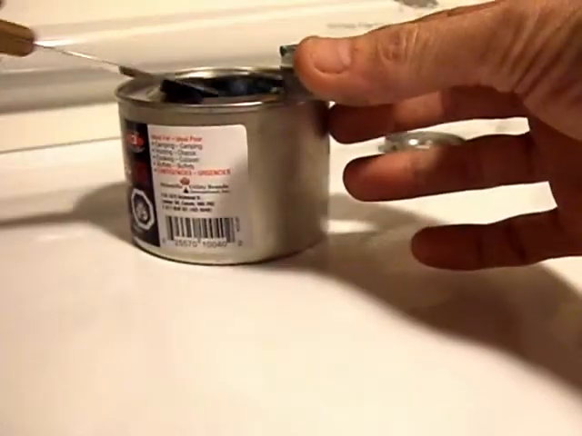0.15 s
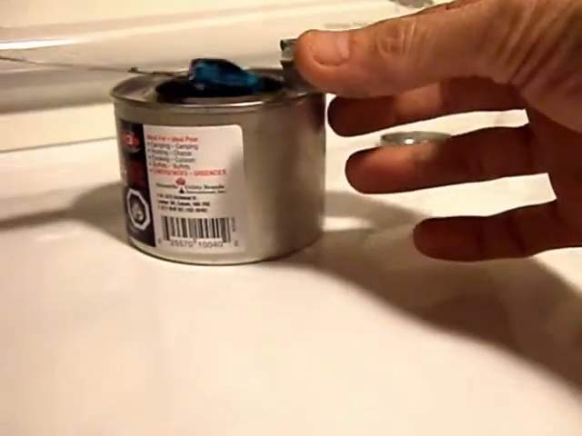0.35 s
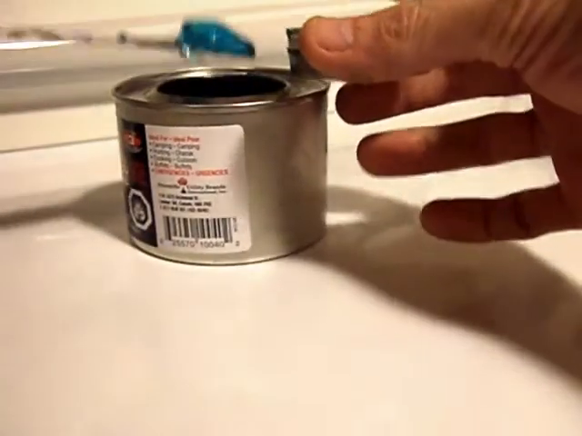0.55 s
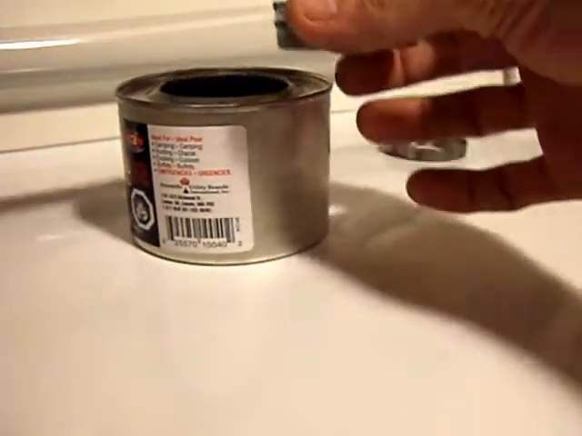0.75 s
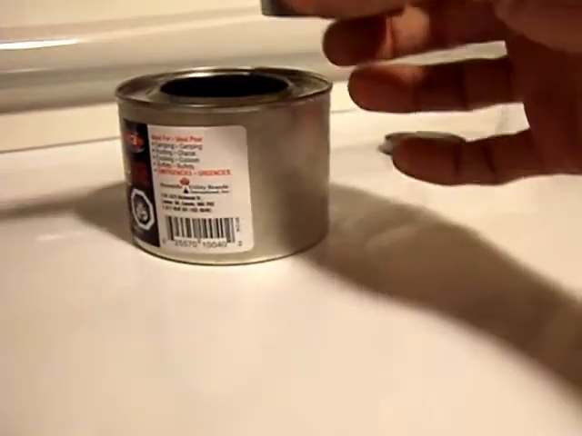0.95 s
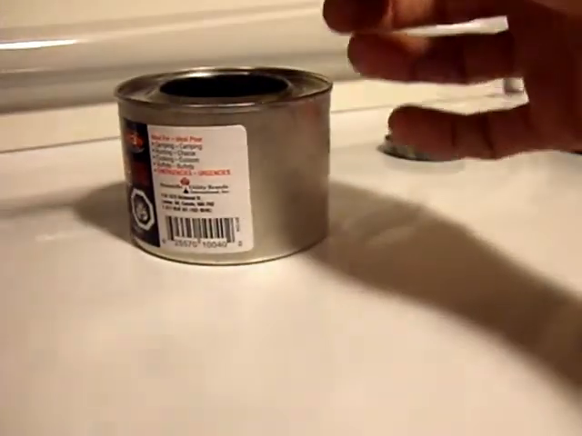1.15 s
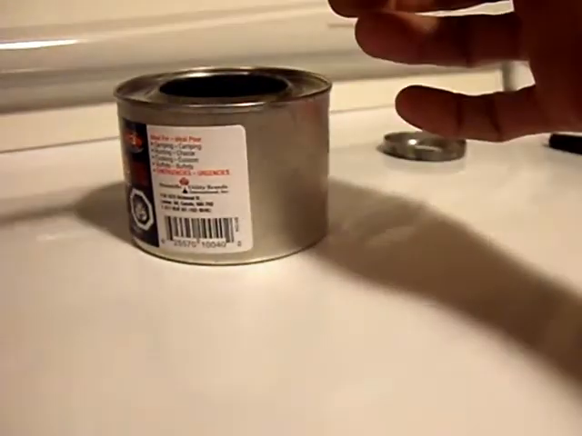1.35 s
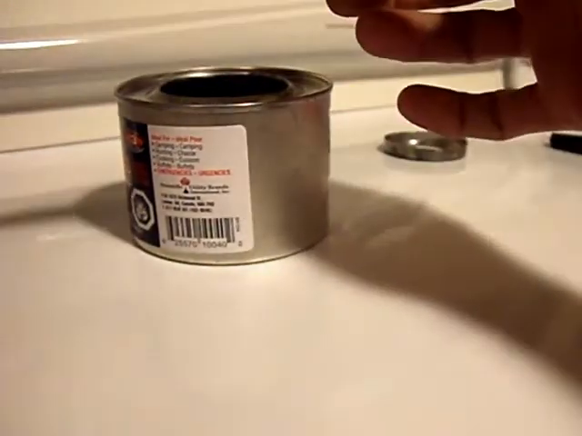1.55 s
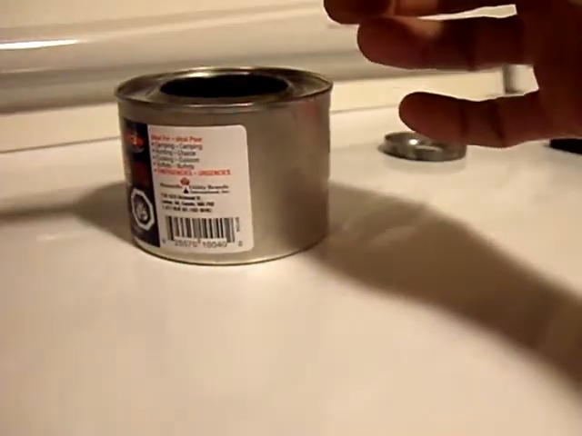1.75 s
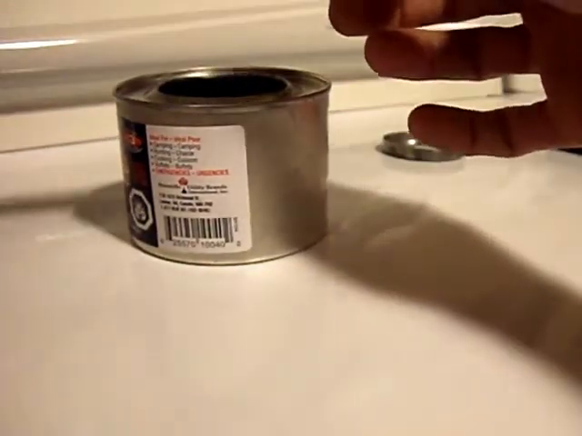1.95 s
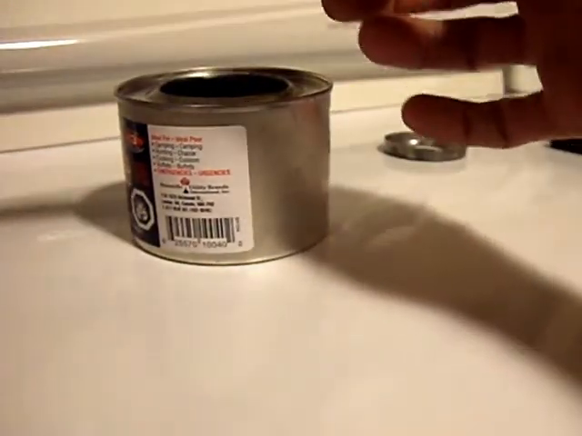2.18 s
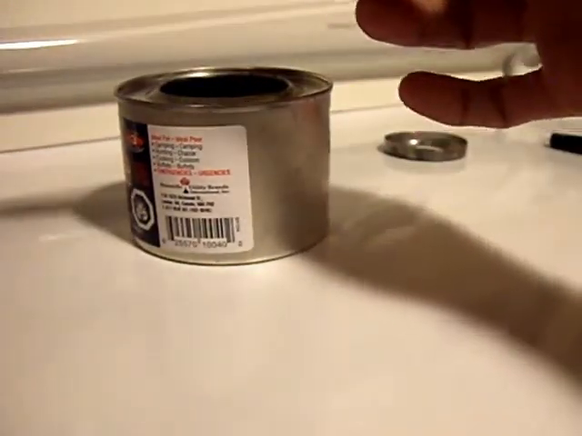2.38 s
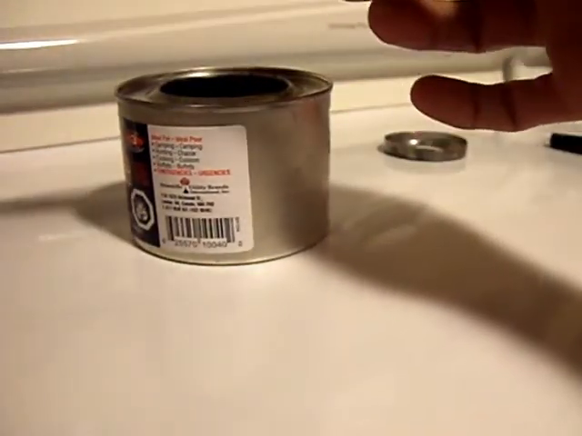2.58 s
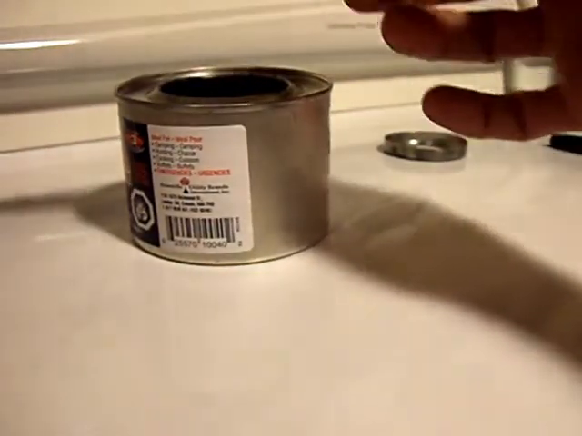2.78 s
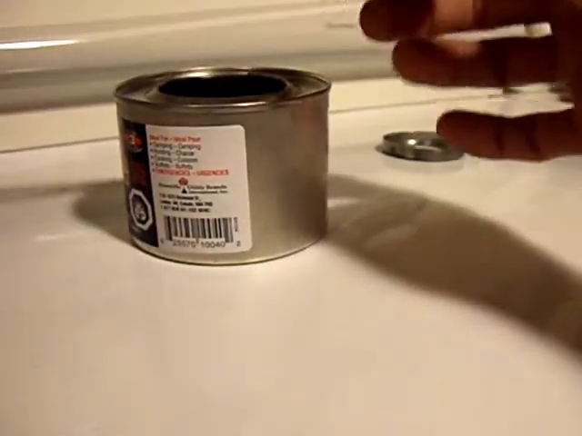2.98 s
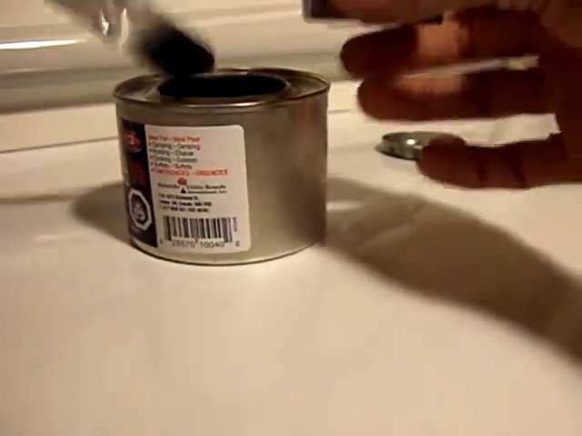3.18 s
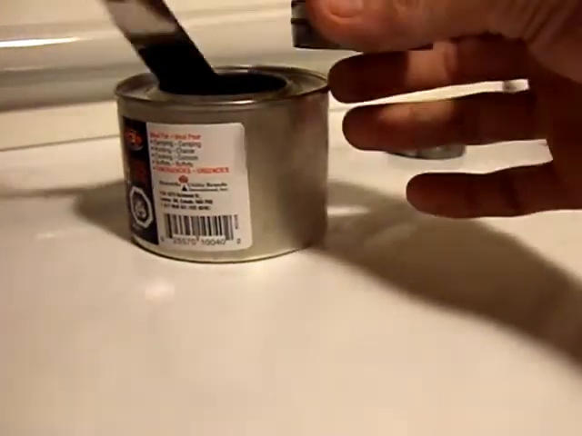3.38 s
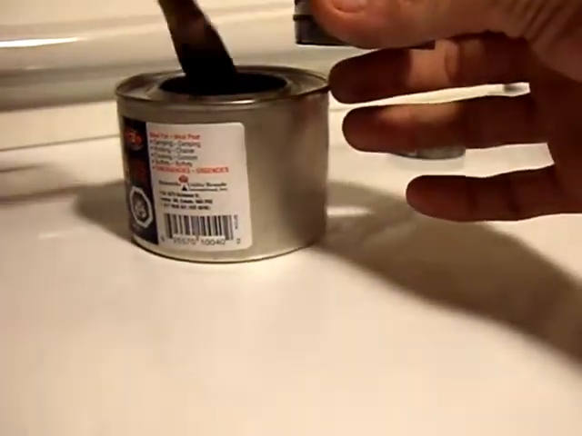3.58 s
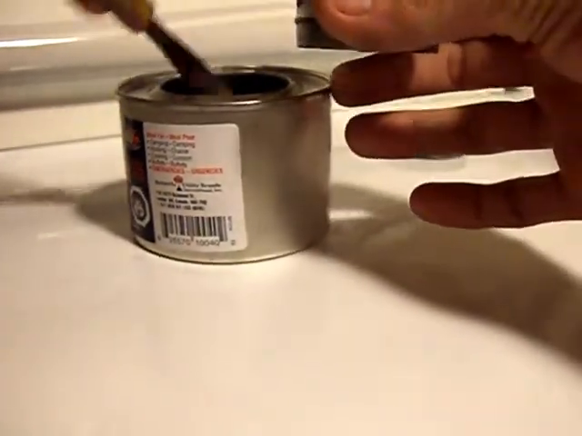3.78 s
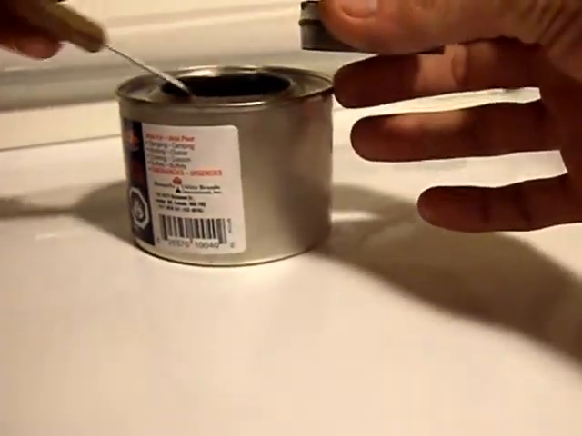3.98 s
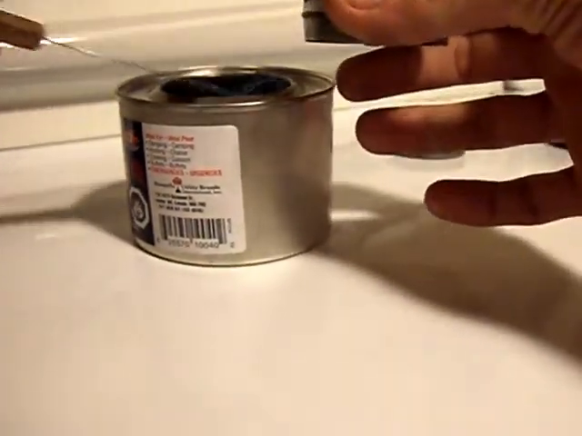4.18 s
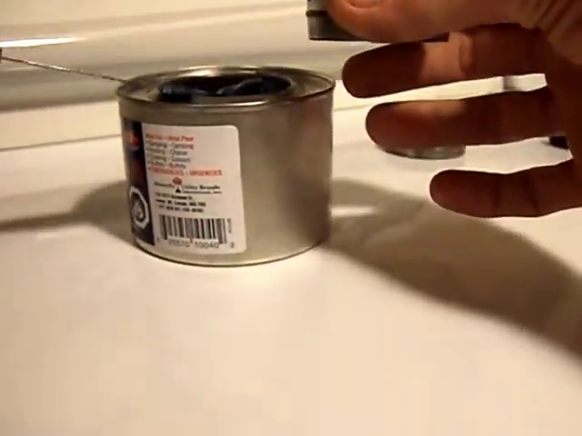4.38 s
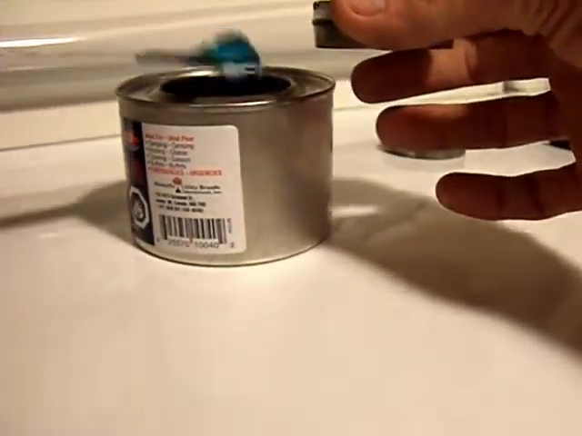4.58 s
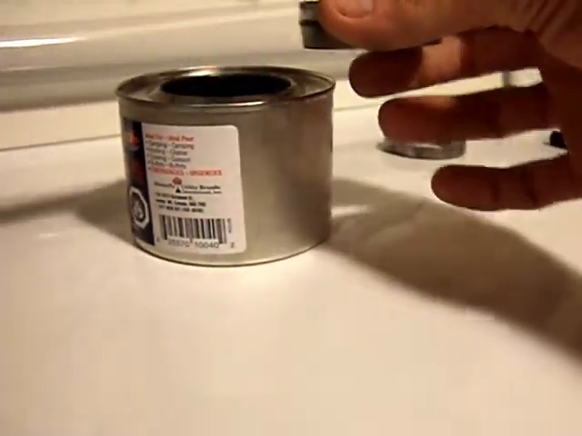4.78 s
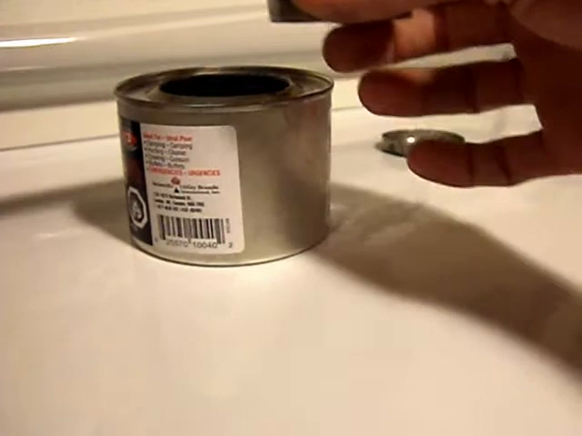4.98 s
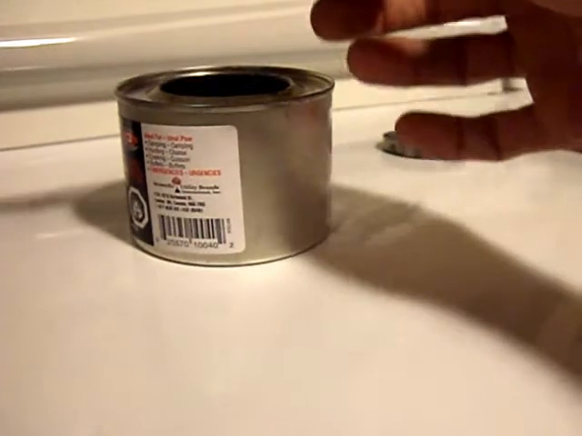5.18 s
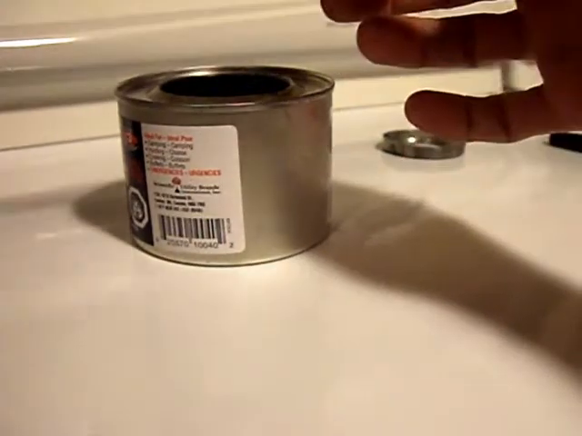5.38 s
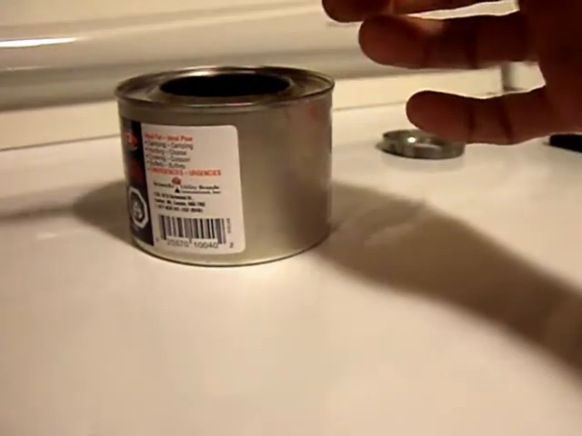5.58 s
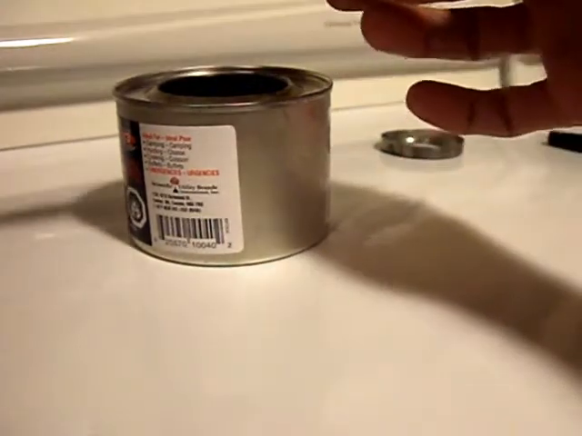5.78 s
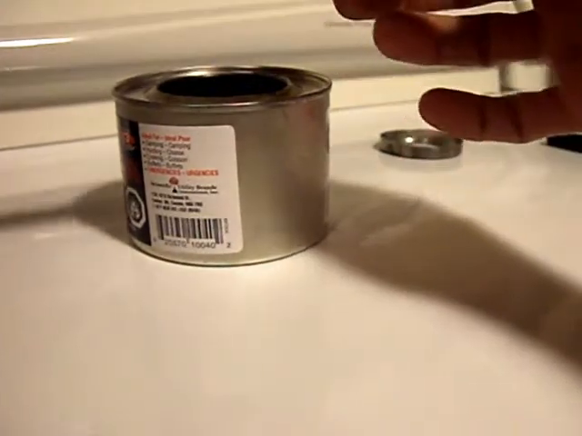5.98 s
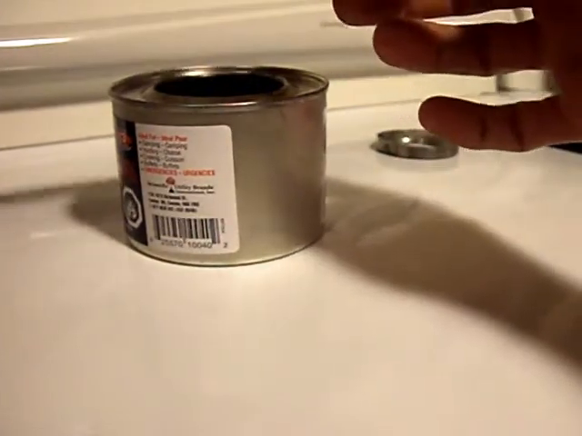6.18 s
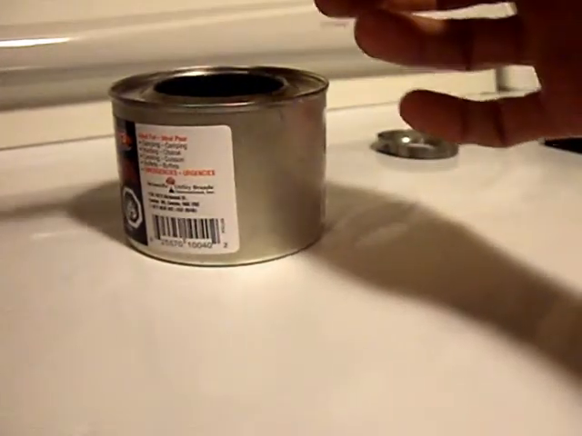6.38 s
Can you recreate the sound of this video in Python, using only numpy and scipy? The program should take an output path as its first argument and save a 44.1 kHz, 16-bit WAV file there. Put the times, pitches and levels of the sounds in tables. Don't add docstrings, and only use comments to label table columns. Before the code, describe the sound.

Bright clinks and short wet scrapes of a spoon on tin, a loud can clatter midway, then faint taps, with camera whine and low hum behind.

```python
import sys
import numpy as np
from scipy import signal
from scipy.fft import rfft, irfft
from scipy.io import wavfile

SR = 44100
rng = np.random.default_rng(int(sys.argv[2]) if len(sys.argv) > 2 else 0)


def elevation(decibels):
    levels = np.asarray(decibels, float)
    return 10 ** (levels / 20)


def put_to_file(sound):
    columns = np.atleast_2d(sound).T
    safe = np.clip(columns, -1, 1)
    whole_steps = np.round(safe * 32767)
    wavfile.write(sys.argv[1], SR, whole_steps.astype(np.int16))


N = 284445


def can():
    edges_hz = [520, 1050, 1700, 4500, 15600]
    # start in seconds, wall level in dB, base against it in dB, brightness in dB.
    knocks_at = [
        [(0.0024, -40.5, 0, 10.5), (0.084, -41, 2, -3), (0.136, -38, 9, 2)],
        [(3.3019, -4.5, -9.5, 3), (3.371, -11, -14, -12), (3.384, -24, -7, 0), (3.396, -22, -9, -6),
         (3.411, -20, -16, -1), (3.44, -13, -14, -2), (3.458, -18.5, -15, 5.5), (3.483, -18, -18, -12)],
        [(3.6316, -26.5, 2.5, 6), (3.6775, -13, 0.5, 5.5)],
        [(3.903, -6, 1.5, 5.5), (3.93, -20.5, 8, 5.5)],
        [(4.4206, -14, 10, 8.5)],
    ]
    # time of full pressure in seconds, hold in seconds,
    # wall level in dB, lift-off in seconds for 30 dB, rasp in dB.
    strokes_at = [
        [(0.0, .01, -38.5, 0.11, 2), (0.04, 0.021, -46, 0.1, -7), (0.086, .03, -45, 0.08, -2),
         (0.128, 0.02, -43, 0.03, -6)],
        [(3.316, 0.038, -21.5, 0.05, 3), (3.375, 0.11, -23, 0.0648, -2), (3.51, 0.0059, -49, 0.18, -24)],
        [(3.637, .022, -35.5, -0.04, 8.5), (3.683, 0.0011, -20.5, 0.097, 0), (3.7, 0.0044, -35.5, 0.15, -2)],
        [(3.915, 0.047, -34.5, 0.07, 3), (3.972, 0.024, -27.5, 0.0969, -3.5), (4.005, 0.036, -26, 0.0755, 5)],
    ]
    # frequency in Hz, t60 in seconds.
    shell_rings = [(548, .7), (824, .13), (904, .22), (956, .62)]
    shell_db = [(-19, -22, -18, -12.5, -18), (-5, -7.5, -13, -2, 0), (-5, -6, 0.5, -3, 0),
                (-8, -11, -11, -4.5, -1)]
    wall_hz = [760, 1140, 1310, 1385, 1500, 1690, 1800, 2240, 2320, 2380, 2640, 2810, 3110, 3450, 3750,
               4240, 5200, 5610, 6260, 7480, 8090, 8740, 9300, 10500, 11250, 12400]
    # width in Hz, then level in dB at each of the five places.
    wall_modes = [(55, 3.5, -16, -12, -3, -42), (61, -2, 7.5, 4.5, -14, -28), (55, 5, 5, -8.5, 6.5, -9.5),
                  (55, -5, -9, -3, -14, -15), (55, -11, -11, -11, -5, -16), (58.6, 4.5, -2, -4, -2, -17),
                  (45, -7, -8, -12, -3, -4), (70.4, -13, -29, -5, -5, -24), (54.7, 0, 4.5, -2, -2, -11),
                  (54.6, -11, 6.5, 0, -1, -20), (55, -4, 4, -13, -6, -20), (60, -19, 1.5, -17, -3, -6),
                  (55, -12, 0.5, 1.5, -3, -32), (91, -4.5, 2, 0, -4, -3), (60, -24, -6, -0.5, -3, -2),
                  (55, -11, -4.5, -6.5, -4, -23), (60, -20, -8, -5, -1, -1), (60, -8, -2, -10, -4.5, -18),
                  (59.4, 6, -2, 1, -1.5, 3.5), (110, -5, -1, -3, -3.5, -4), (80, -10, 3, -3, -3, -11),
                  (120, -6, -1, -4, -1, -6), (120, -9, -10, -9, -1.5, -22), (80, -1.5, -4, 0, 5.5, -4),
                  (90, -11, -5, 0, -2, 4), (200, -14, -15, -1.5, 1.5, -5)]
    rub_db = [-4, -2, -3.5, -8.5]
    rasp_share = [-0.051, -0.18, 0.41, 0.92]
    keeps = [(0.81, 0.4), (0.82, 0.48), (0.62, 0.15), (0.31, 0.68), (0.84, .55)]
    touch = (rub_db, rasp_share, 0.017)
    slips = friction(per_s=4000, uneven_db=3, stutter_db=1.5)
    out = np.zeros(N)
    for place, (knocks, strokes) in enumerate(zip(knocks_at, strokes_at + [[]])):
        shell = [(hz, db[place], t60) for (hz, t60), db in zip(shell_rings, shell_db)]
        peaks = [(hz, width, db[place]) for hz, (width, *db) in zip(wall_hz, wall_modes)]
        modes = shell + as_modes(peaks, narrowing=1.4)
        out += vessel(modes, edges_hz, struck(knocks, upper_db=-5), strokes, touch, slips,
                      crack_db=[-6, 3, 9, 15], crack_s=0.012, rattle=0.06, keeps=keeps[place], grit_db=-8)
    return out


def tin():
    edges_hz = [1000, 3100, 4500, 7200, 15600]
    # frequency in Hz, width in Hz, level in dB.
    peaks_empty = [(1280, 150, -16), (2670, 39, -8), (2723, 46, -3.5), (3320, 110, -12), (3620, 160, -7),
                   (3960, 49, 2.5), (4070, 90, -7), (5020, 99, -8), (5680, 42, -10.5), (6300, 37, -3.5),
                   (6620, 60, -12), (8050, 140, -2), (11580, 170, -11)]
    peaks_dabbed = [(2470, 85, -9.5), (4000, 44, -14), (4050, 130, 2), (4860, 64, -20), (5740, 130, -16),
                    (6370, 71, -14), (8000, 130, -8.5), (10800, 98, -8), (11970, 210, -8)]
    peaks_half = [(2460, 55, -12.5), (3910, 100, 8), (5280, 230, -10), (5960, 620, -6), (8150, 120, -7.5),
                  (10270, 76, -10.5), (10800, 63, -15), (11020, 50, -8), (3980, 150, -7), (13500, 63, -16)]
    peaks_full = [(2390, 110, -17), (3780, 48, 11), (4020, 87, -9), (4670, 150, -14.5), (5970, 93, -16),
                  (7640, 110, -5.5), (8070, 97, 1.5), (8830, 74, -1), (9750, 130, -3), (10760, 330, -3),
                  (11300, 290, -4), (12270, 170, -3)]
    # start in seconds, main ring in dB, low band against it in dB, brightness in dB.
    taps_empty = [(1.268, -14.5, -2, 0.5), (1.284, -24.5, 4, -1), (1.3366, -19, -1.5, 3),
                  (1.3494, -28, 4, -9), (1.3996, -30, 7.5, -10), (1.408, -27.5, 5, -8)]
    taps_dabbed = [
        (1.6275, -18, -14, -5.5),
        (1.845, -31.5, -11, 0.5),
    ]
    taps_half = [(2.3426, -8.5, -17.5, -4.5), (2.3676, -19, -23, -30), (2.4765, -32, -7, -2.5),
                 (2.555, -36.5, 0, -16), (2.596, -38, 1, -2), (2.71, -43, 0, 14), (2.756, -36, -9, 8.5),
                 (2.855, -29, -21, -10), (2.903, -25, -8, -7), (2.9366, -17.5, -13, -8),
                 (2.9532, -33, -4, 7.5)]
    taps_full = [(5.7965, -28.5, -2.5, 5), (5.8365, -28.5, -2, 6), (5.885, -35, -10, -14),
                 (5.9778, -34, -3, -1.5), (6.0578, -33, -17, 0), (6.076, -45, -14, -10),
                 (6.103, -41, -16, -6), (6.112, -36, -14, -12), (6.1294, -44.5, -6, 20),
                 (6.1464, -33, -24, 9)]
    # time of full pressure in seconds, hold in seconds,
    # main ring in dB, lift-off in seconds for 30 dB, rasp in dB.
    wipes_empty = [
        (1.394, 0.02, -33, 0.045, -5),
    ]
    wipes_dabbed = [(1.54, 0.0062, -52, 0.0092, -12), (1.6, .02, -55, .02, 0),
                    (1.68, 0.011, -56, 0.017, -5), (1.72, 0.15, -55, .05, -1),
                    (1.864, 0.064, -53.5, 0.16, 3), (1.929, 0.0089, -48, 0.077, -6),
                    (1.953, 0.012, -39.5, 0.057, 2), (1.988, 0.0064, -45.5, 0.023, 3.5)]
    wipes_half = [(2.361, 0.054, -37.5, 0.1, 0.5), (2.479, 0.016, -39, 0.054, -4),
                  (2.557, 0.0034, -41, 0.013, -7), (2.597, 0.0055, -38.5, 0.065, 1),
                  (2.687, 0.082, -52.5, 0.023, 10.5), (2.78, 0.018, -43, 0.33, 0.5),
                  (2.853, .01, -41.5, 0.18, 10), (2.948, 0.0096, -29, 0.015, 3),
                  (2.975, .01, -62, 0.045, 4)]
    wipes_full = [(5.85, .005, -45, 0.041, -4), (5.884, 0.076, -58.5, 0.037, 6),
                  (5.984, 0.0045, -48, .04, -3), (6.01, .04, -58, 0.056, 12), (6.06, .006, -50, 0.1, 5),
                  (6.112, 0.0045, -36.5, 0.033, -1), (6.129, 0.0031, -43, 0.021, 4),
                  (6.148, 0.0055, -42.5, 0.021, 8)]
    rub_db = [-8.5, -3.5, -7, -3.5]
    rasp_share = [0.33, 0.041, 0.68, 0.62]
    touch = (rub_db, rasp_share, 0.03)
    slips = friction(per_s=8000, uneven_db=3.5, stutter_db=1.6)
    fillings = [(peaks_empty, taps_empty, wipes_empty), (peaks_dabbed, taps_dabbed, wipes_dabbed),
                (peaks_half, taps_half, wipes_half), (peaks_full, taps_full, wipes_full)]
    out = np.zeros(N)
    for peaks, taps, wipes in fillings:
        modes = as_modes(peaks, narrowing=1.5)
        out += vessel(modes, edges_hz, struck(taps, upper_db=-5.5), wipes, touch, slips,
                      crack_db=[2.4, 6.7, 2.3, 6], crack_s=0.006, rattle=0.15, keeps=(0.9, 0.3), grit_db=2.5)
    return out


def vessel(modes, edges_hz, hits, strokes, touch, slips, crack_db, crack_s, rattle, keeps, grit_db):
    rows = np.array(hits)
    starts = [hits[0][0]] + [row[0] - 0.05 for row in strokes]
    ends = [hits[-1][0]] + [row[0] + row[1] for row in strokes]
    first = max(int(min(starts) * SR) // 2048 * 2048, 0)
    last = min(N, int(max(ends) * SR) // 2048 * 2048 + 22000)
    size = last - first
    out = np.zeros(N)

    lag = np.arange(160)
    contact = rattle * rng.standard_normal((len(rows), len(lag))) * np.exp(-lag / 40)
    contact[:, 0] = 1
    at = (np.ceil(rows[:, :1] * SR).astype(int) + lag).ravel() - first

    knocked, held = ([(hz, db, np.clip(share, 0.15, 1) * t60) for hz, db, t60 in modes] for share in keeps)
    gains = pressure(strokes, np.arange(first, last) / SR, *touch)
    for k, rub in enumerate(gains):
        low_hz, high_hz = edges_hz[k], edges_hz[k + 1]
        free = response(knocked, low_hz, high_hz, crack_db[k], crack_s, spread_db=0.5)
        since = np.arange(len(free)) / SR
        free = free * (1 + 3.3 * np.exp(-(since / 0.011) ** 2))
        level = elevation(rows[:, 1:2] + rows[:, k + 2:k + 3])
        blows = np.bincount(at, (contact * level).ravel(), size)
        out[first:last] += signal.fftconvolve(blows / np.abs(free).max(), free)[:size]
        if not strokes:
            continue
        spots = elevation(9.1 * np.array([drift(10.4, size) for spot in range(3)]))
        for weight in spots / np.linalg.norm(spots, axis=0):
            answer = response(held, low_hz, high_hz, crack_db[k] + grit_db, crack_s, spread_db=2.5)
            drive = weight * rub * slips[first:last]
            out[first:last] += signal.fftconvolve(drive, answer)[:size] / np.linalg.norm(answer)
    return out


def struck(hits, upper_db):
    return [(s, db, low, 0, bright + upper_db, bright) for s, db, low, bright in hits]


def as_modes(peaks, narrowing):
    return [(hz, db + 20 * np.log10(width / 50), narrowing * 2.2 / width) for hz, width, db in peaks]


def response(modes, low_hz, high_hz, crack_db, crack_s, spread_db):
    t = np.arange(SR // 2) / SR
    crack = rng.standard_normal(len(t)) * elevation(-60 * t / crack_s)
    out = elevation(crack_db) * band(crack, max(low_hz, 700), high_hz)
    for hz, db, t60 in modes:
        luck = spread_db * rng.standard_normal(2)
        if low_hz <= hz < high_hz:
            envelope = elevation(db + luck[0] - 60 * t / t60) * (1 - np.exp(-hz * t / 1.2))
            out += envelope * np.sin(2 * np.pi * hz * (1 + 0.0012 * luck[1]) * t)
    return out


def friction(per_s, uneven_db, stutter_db):
    sizes = elevation(uneven_db * np.minimum(rng.exponential(1, N), 4)) * rng.choice([-1, 1], N)
    slipping = rng.random(N) < per_s / SR
    return unit(sizes * slipping * elevation(stutter_db * drift(60)))


def pressure(strokes, t, rub_db, rasp_share, press_s):
    out = np.zeros((4, len(t)))
    for s, hold_s, db, lift_s, rasp_db in strokes:
        pressing = np.maximum(s - t, 0) / press_s
        lifting = np.maximum(t - s - hold_s, 0) / max(lift_s, 0.003)
        colour_db = np.array(rub_db) + rasp_db * np.array(rasp_share)
        out += elevation(db - 30 * np.minimum(pressing + lifting, 6) + colour_db[:, None])
    return out


def hollow():
    # start in seconds, length in seconds, first frequency in Hz, last frequency in Hz, level in dB.
    slides = [
        (2.361, 0.14, 3800, 3050, -35),
        (2.537, 0.045, 5100, 4850, -39.5),
        (2.586, 0.066, 4880, 4810, -36),
        (6.007, 0.13, 3960, 4330, -46),
    ]
    out, flutter = np.zeros(N), drift(260)
    for s, length_s, from_hz, to_hz, db in slides:
        u = np.linspace(0, 1, int(length_s * SR))
        i = int(s * SR)
        hz = to_hz + (from_hz - to_hz) * (1 - u) ** 5.4
        swell = np.sin(np.pi * u ** 0.38) ** 2
        tone = np.sin(2 * np.pi * np.cumsum(hz) / SR)
        out[i:i + len(u)] += elevation(db) * swell * flutter[i:i + len(u)] * tone
    return out


def thuds():
    # start in seconds, peak in dB, frequency in Hz, t60 in seconds.
    pushes = [(2.957, -26, 470, 0.028), (2.957, -34.5, 272, 0.099), (3.647, -29, 220, 0.051),
              (3.679, -21, 200, 0.071), (3.681, -8, 567, 0.018), (3.727, -23.5, 244, 0.037),
              (3.902, -17.5, 325, 0.026), (3.907, -29, 467, 0.3), (3.7, -26, 240, 0.06)]
    t, out = np.arange(N) / SR, np.zeros(N)
    for s, db, hz, t60 in pushes:
        since = np.maximum(t - s, 0)
        envelope = elevation(db - 60 * since / t60) * (1 - np.exp(-since / 0.0011))
        out += envelope * np.sin(2 * np.pi * hz * since)
    return out


def room(x):
    # frequency in Hz, t60 in seconds.
    decay = [(200, 0.48), (1000, 0.26), (4000, 0.16), (12000, 0.11)]
    t = np.arange(SR // 2) / SR
    edges_hz = np.r_[100 * 2 ** np.arange(7), 16000]
    tail = np.zeros(len(t))
    for low_hz, high_hz in zip(edges_hz[:-1], edges_hz[1:]):
        t60 = at_hz(decay, np.sqrt(low_hz * high_hz))
        tail += band(rng.standard_normal(len(t)), low_hz, high_hz) * elevation(-60 * t / t60)
    tail *= 1 - np.exp(-t / 0.00037)
    return signal.fftconvolve(x, tail / np.linalg.norm(tail))[:N]


def background():
    # frequency in Hz, level in dB per Hz.
    hiss_spectrum = [(410, -44), (750, -10.5), (1480, -1.5), (2030, -3.5), (2970, -6), (6600, -13),
                     (7300, -9.5), (7900, -14), (8300, -13), (10200, -15), (12300, -11), (13300, -8),
                     (15000, -5.5), (16500, -36)]
    # frequency in Hz, level in dB per Hz.
    rumble_spectrum = [(15, -45), (25, -17), (69, -16), (107, -4), (177, -2), (412, -1), (517, -2),
                       (1200, -8), (1560, -32), (2640, -120)]
    # multiple of the motor's rate, level in dB against the rumble.
    orders = [(1, -20.5), (2, -11.5), (3, -11.5), (4, -16), (5, -15), (6, -16.5), (7, -11)]
    # time in seconds, level in dB, half width in seconds.
    swells = [
        (0.0, 10, 0.12),
        (2.17, 3.5, 0.22),
        (2.95, 6, 0.13),
        (3.39, 16.5, 0.098),
        (3.74, 15, 0.079),
        (4.05, 10.5, 0.16),
        (6.4, 4, 0.31),
    ]
    motor_hz = 57.95
    t = np.arange(N) / SR
    early = np.exp(-t / 0.53)
    hiss_db = -61.5 - 11.5 * early
    rumble_db = -48.5 - 10 * early
    swell_db = sum(db * np.exp(-((t - s) / width) ** 2) for s, db, width in swells)
    hiss = elevation(hiss_db) * (elevation(9.5) * coloured(hiss_spectrum) + whine())
    hum = sum(elevation(db) * np.sin(2 * np.pi * (k * motor_hz * t + rng.random())) for k, db in orders)
    rumble = coloured(rumble_spectrum)
    rumble = rumble + (elevation(swell_db) - 1) * band(rumble, 184, 1040)
    return hiss + elevation(rumble_db) * (elevation(-2.5 + 1.9 * drift(1.7)) * rumble + hum)


def whine():
    frame_hz, frame_start_s, whine_hz, whistle_hz = 29.97, 0.0048, 14462.5, 8183
    t = np.arange(N) / SR
    since = (t - frame_start_s) % (1 / frame_hz)
    tick = elevation(-3) * np.exp(-since / 0.0003) * np.sin(2 * np.pi * 13400 * since)
    tone = np.sin(2 * np.pi * whine_hz * since)
    return elevation(5) * (tone + tick) + elevation(-5.5) * np.sin(2 * np.pi * whistle_hz * t)


def coloured(spectrum):
    hz = np.arange(1, N // 2 + 2) * SR / N
    return unit(irfft(rfft(rng.standard_normal(N)) * elevation(at_hz(spectrum, hz)), N))


def drift(rate_hz, size=N):
    r = np.exp(-2 * np.pi * rate_hz / SR)
    settle = SR // 4
    return unit(signal.lfilter([1], [1, -2 * r, r * r], rng.standard_normal(size + settle))[settle:])


def band(x, low_hz, high_hz):
    return signal.sosfilt(signal.butter(2, [low_hz, high_hz], "band", fs=SR, output="sos"), x)


def at_hz(points, hz):
    table_hz, values = np.array(points).T
    return np.interp(np.log(hz), np.log(table_hz), values)


def unit(x):
    return x / np.sqrt(np.mean(x ** 2) + 1e-20)


def scene():
    metal = can() + tin() + hollow()
    metal = signal.sosfilt(signal.butter(4, 480, "high", fs=SR, output="sos"), metal)
    metal = signal.sosfilt(signal.butter(2, 15000, fs=SR, output="sos"), metal)
    near = metal + thuds()
    return (near + elevation(-10.5) * room(near) + background())[None]


def band_limit(x):
    return signal.sosfilt(signal.butter(12, 16360, fs=SR, output="sos"), x)


def record(dry):
    # frequency in Hz, width in Hz, share taken out.
    dips = [
        (7200, 460, 0.8),
        (8020, 230, 0.81),
    ]
    heard = dry.copy()
    for hz, width, share in dips:
        heard -= share * signal.lfilter(*signal.iirpeak(hz, hz / width, fs=SR), dry)
    cut = signal.sosfilt(signal.ellip(10, 0.5, 60, 15700, fs=SR, output="sos"), heard)
    return band_limit(1.746 * np.tanh(cut / 1.852))


dry = scene()
out = record(dry)
put_to_file(out)
```